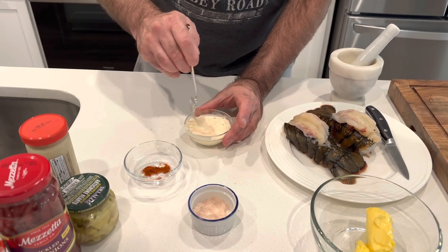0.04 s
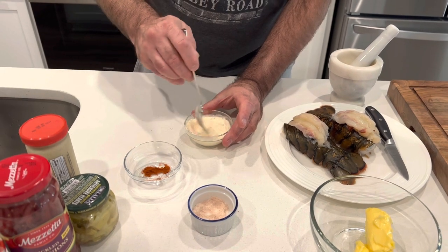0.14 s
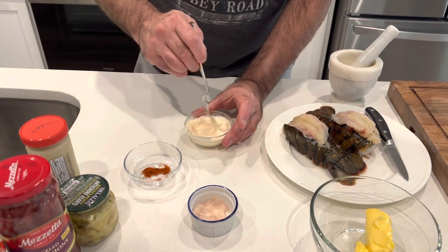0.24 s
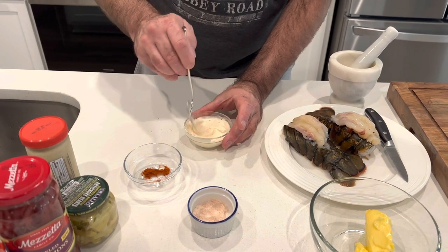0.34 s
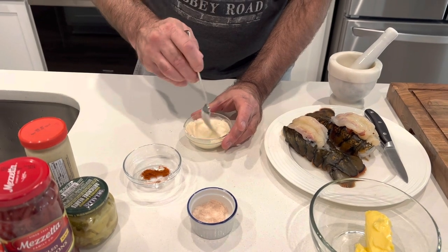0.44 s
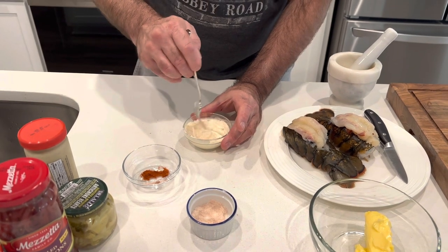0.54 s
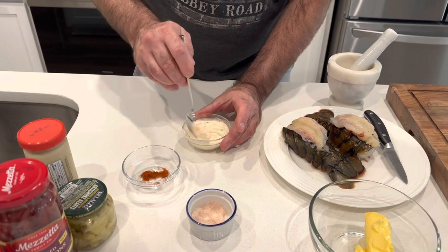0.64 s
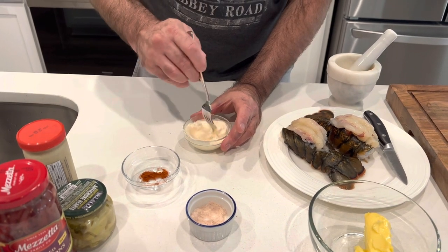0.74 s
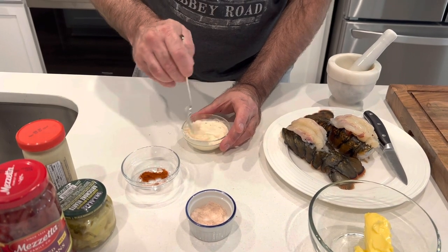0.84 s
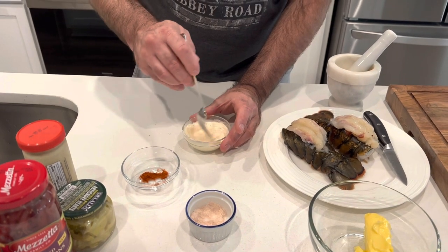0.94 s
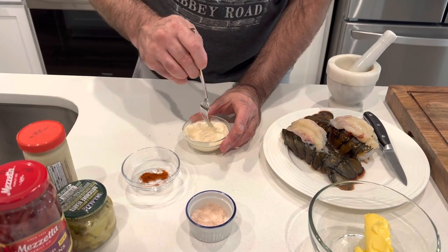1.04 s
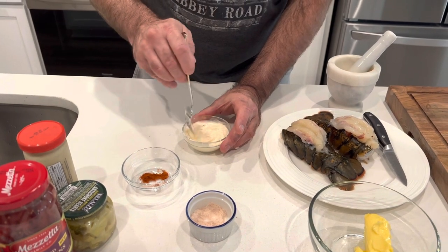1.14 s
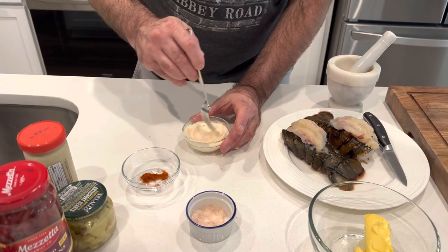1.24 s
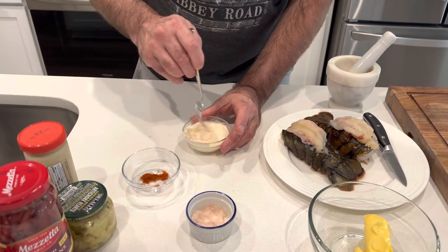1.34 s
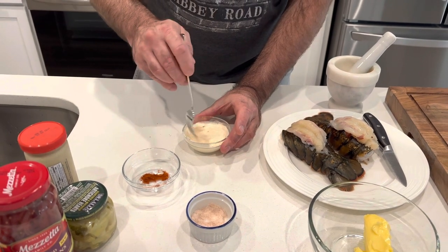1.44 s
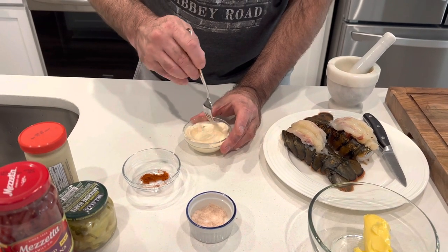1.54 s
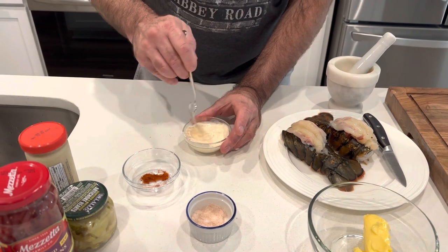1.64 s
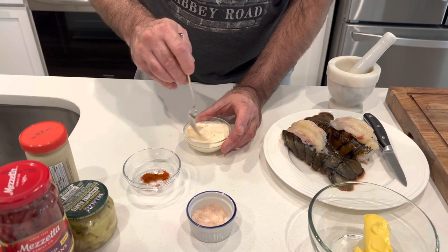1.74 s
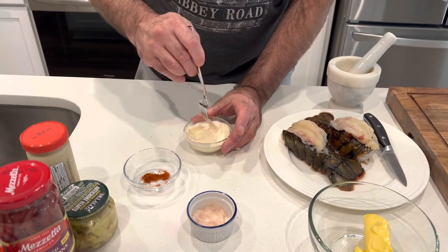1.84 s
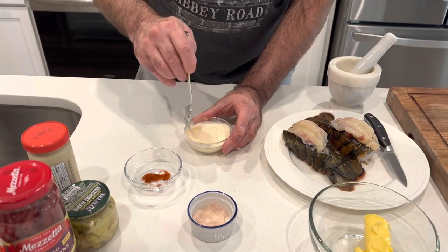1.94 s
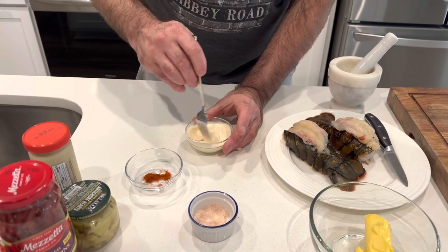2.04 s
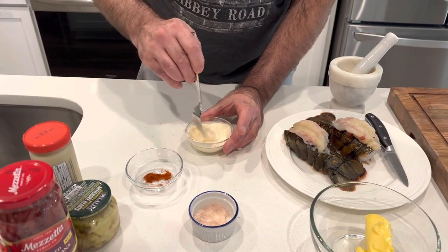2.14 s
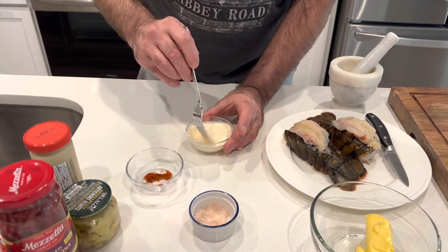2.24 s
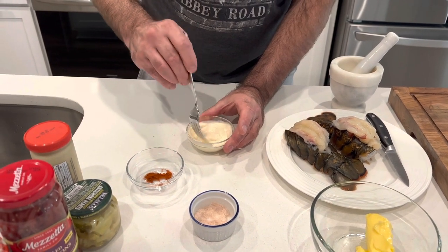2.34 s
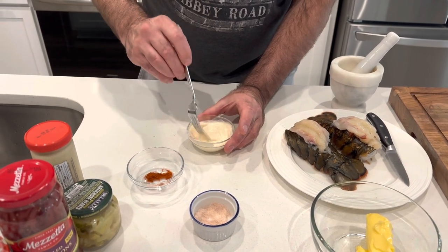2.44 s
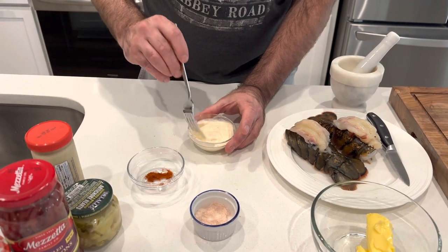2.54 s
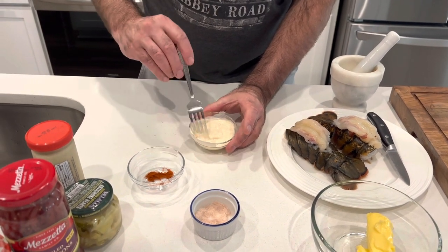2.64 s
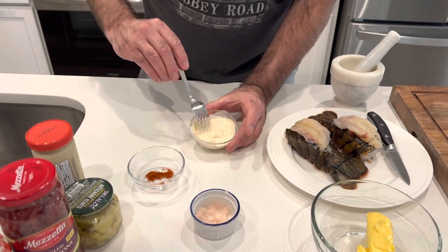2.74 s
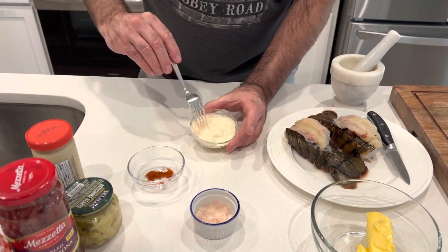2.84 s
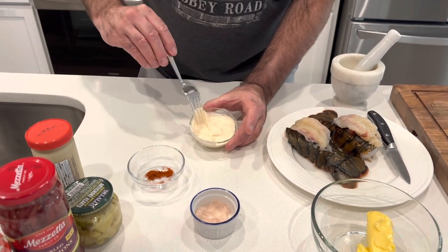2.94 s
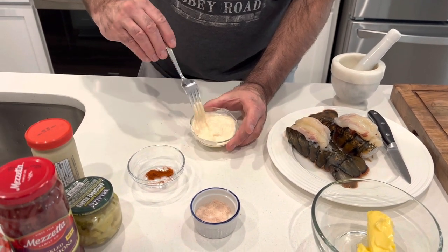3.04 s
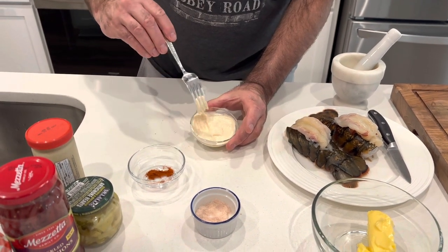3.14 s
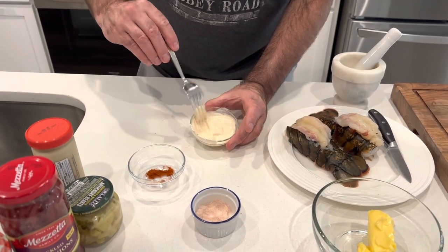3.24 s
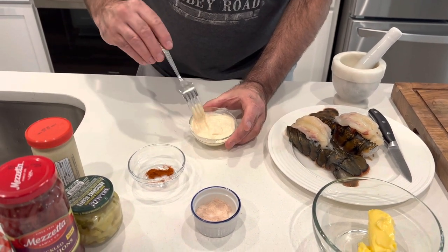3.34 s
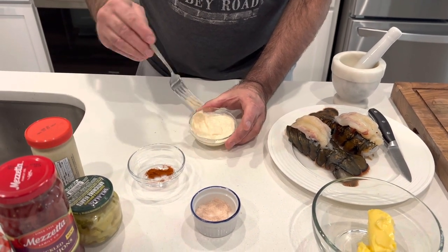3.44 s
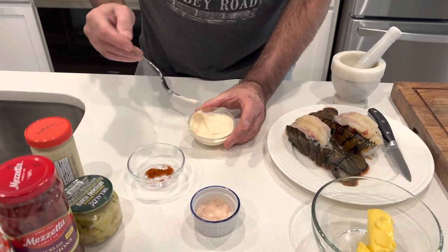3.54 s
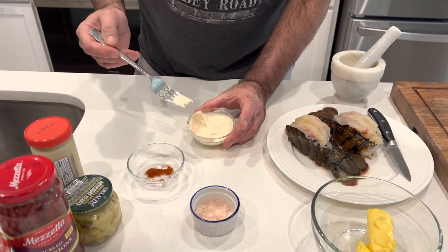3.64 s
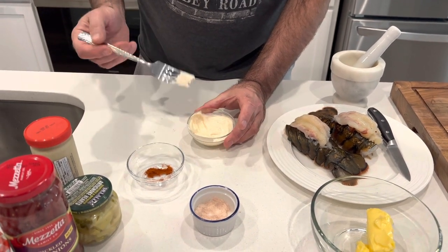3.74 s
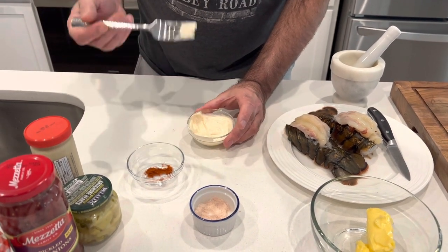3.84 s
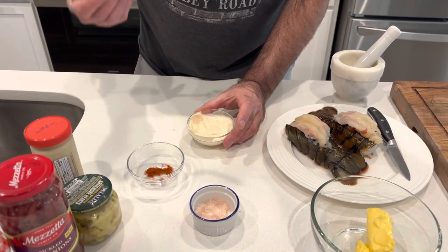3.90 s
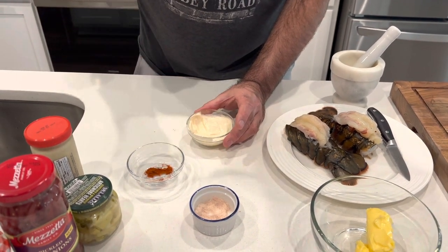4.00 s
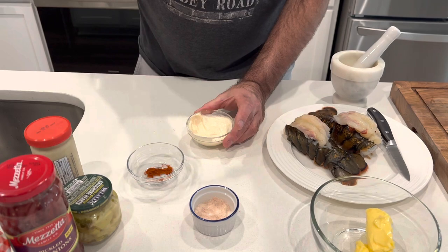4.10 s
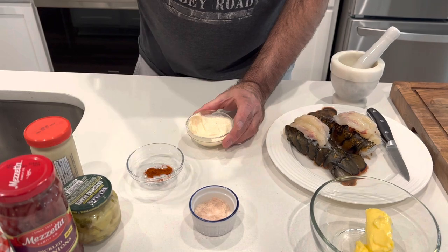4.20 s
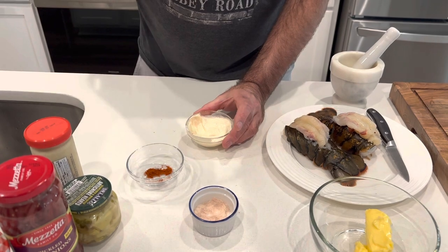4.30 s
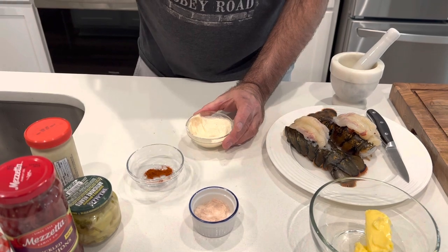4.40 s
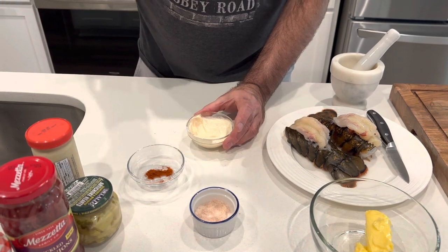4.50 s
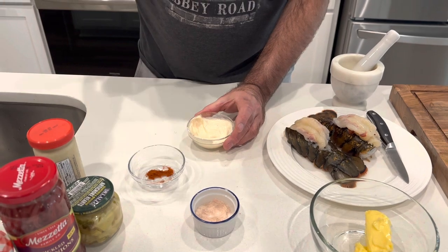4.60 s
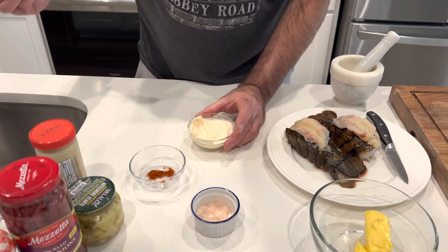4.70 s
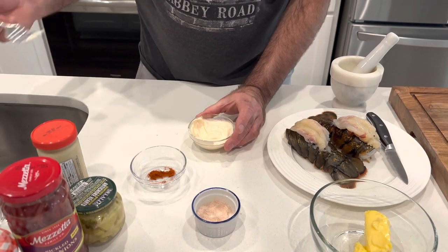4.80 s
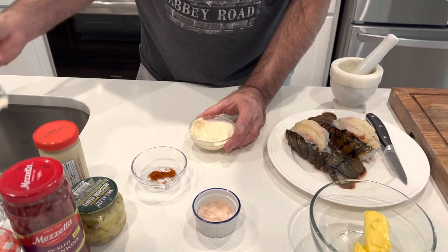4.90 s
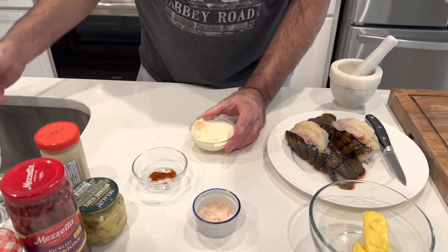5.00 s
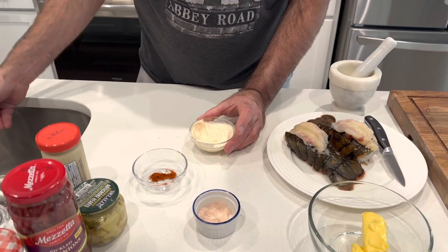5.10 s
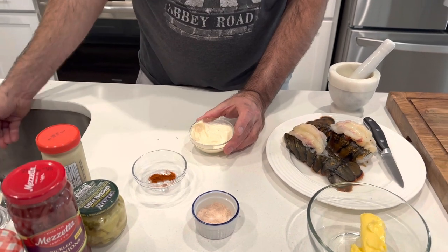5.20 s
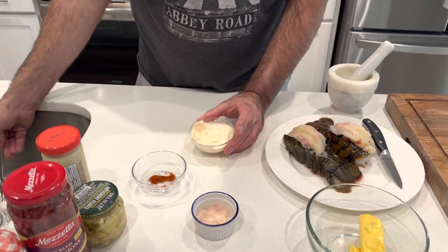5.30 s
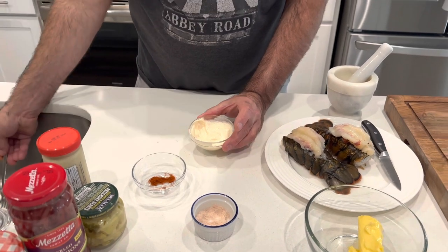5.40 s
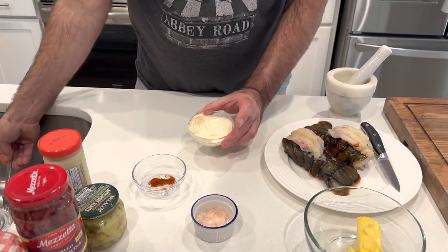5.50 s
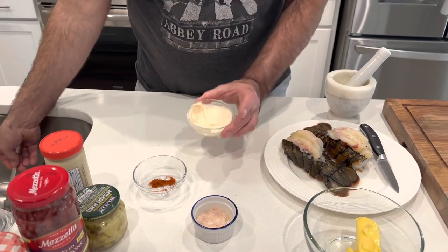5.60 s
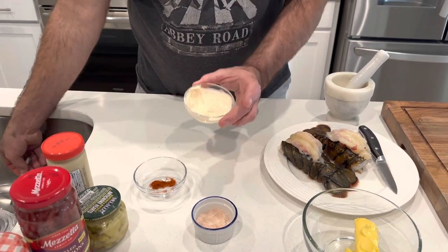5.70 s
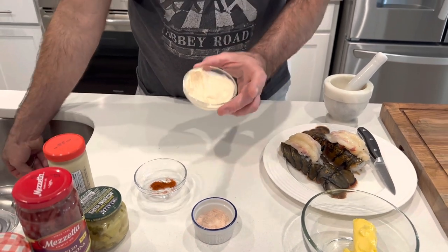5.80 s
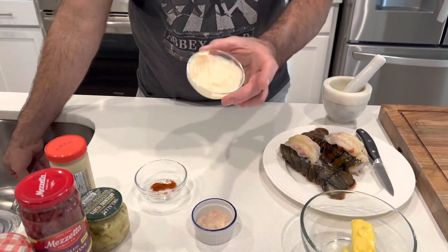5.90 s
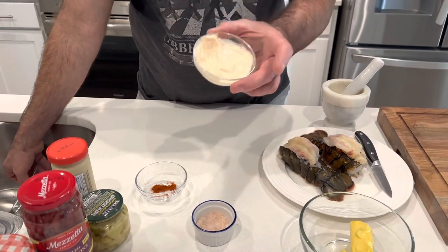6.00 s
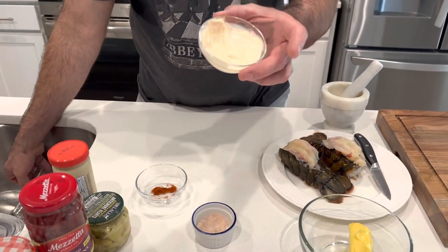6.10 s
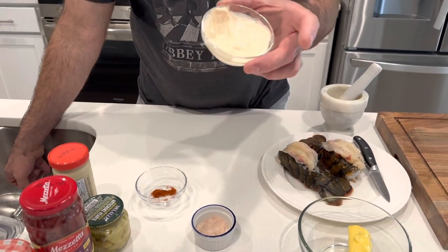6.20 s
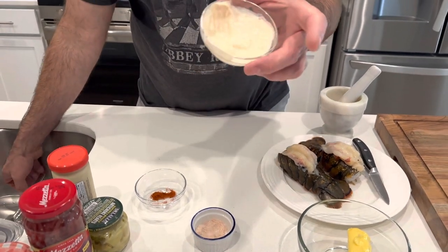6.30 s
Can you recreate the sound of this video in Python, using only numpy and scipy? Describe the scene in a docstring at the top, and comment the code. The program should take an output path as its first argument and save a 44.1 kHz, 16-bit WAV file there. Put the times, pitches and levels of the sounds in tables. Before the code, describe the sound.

A fork stirs thick sauce in a small glass bowl, ticking about four times a second while the bowl knocks on a stone counter. The strokes soften into small squelches, and one sharp tap hits the rim. Faint lip smacks follow in a lull. Then the fork scrapes and drops with a clatter into a steel sink on the left. Appliances hum low in the lively kitchen, heard from nearby in stereo.

```python
"""A fork stirs thick sauce in a small glass bowl on a stone kitchen counter.
Each turn the tines tick on the glass; a few ms later the pushed bowl knocks and rocks on the stone.
The sauce squelches, a sharp tap on the rim sheds it, and lips smack faintly, tasting.
The fork is lowered into a steel sink on the left, slides and drops with a clatter.
Appliances drone low in the live room."""
import sys
import numpy as np
from scipy import signal
from scipy.fft import rfft, irfft, next_fast_len
from scipy.io import wavfile

SR = 44100
rng = np.random.default_rng(int(sys.argv[2]) if len(sys.argv) > 2 else 0)


def generate_wav(signal):
    """Clip the signal to [-1, 1] and save it as 16-bit WAV at the path in sys.argv[1]."""
    frames = np.transpose(np.atleast_2d(signal))
    scaled = np.clip(frames, -1, 1) * 32767
    pcm = np.round(scaled).astype(np.int16)
    wavfile.write(sys.argv[1], SR, pcm)


N = 280035
LEAD = SR // 5   # samples before t = 0
TIME = np.arange(-LEAD, N) / SR
AGE = np.arange(SR * 3 // 5) / SR   # s since a contact
KNOCK_LAG_S = .0027   # tick to bowl meeting stone

# one push per turn: t/s, tick/dB, tick treble/dB, knock/dB, knock brightness/dB,
# rock-back delay/s, rock re knock/dB, thud/dB
STROKES = [(-0.06, -18, -7, -20.5, 9.5, 0.0063, -0.5, -39.5),
           (0.2173, -22.5, -6, -16.5, 8, 0.0065, -24, -44),
           (0.4834, -21, -13, -15.5, 4, .0065, -4.5, -37.5),
           (0.7466, -24, -11.5, -20, 4, 0.0065, -2, -44.5),
           (1.002, -19.5, -13.5, -15.5, 3, 0.0088, -10.5, -44),
           (1.2784, -18, -0.5, -16.5, 5, 0.0061, -2, -45.5), (1.5443, -16.5, -5, -18, 4.5, 0.011, 0.5, -46),
           (1.8254, -20.5, -7, -14, 3, 0.0091, -2, -40.5),
           (2.3103, -26.5, 3.5, -34.5, 5.5, 0.013, -6.5, -38.5),
           (2.4888, -24.5, 6.5, -33.5, 0, 0.014, 5.5, -42)]
# light touches between pushes: t/s, tick/dB, tick treble/dB, knock/dB
GRAZES = [(0.203, -30, -9, -29), (0.3997, -29, 0, -35.5), (0.6525, -30.5, -3, -43), (0.9275, -33, -3, -41),
          (1.999, -30.5, 1, -33), (2.098, -40.5, -14, -42.5), (2.664, -34.5, -10, -42)]
# two wipes on the rim, one sharp tap: t/s, level/dB
RIM_TAPS = [(2.871, -38), (2.904, -47), (3.2675, -17)]


def from_db(db):
    return 10 ** (np.asarray(db) / 20)


def rms_one(x):
    return x / np.sqrt(np.mean(x ** 2) + 1e-20)


def at_hz(points, hz):
    """Interpolate over log frequency."""
    f, value = np.transpose(points)
    return np.interp(np.log(np.maximum(hz, 1)), np.log(f), value)


def envelope(moves, attack_db_per_s, release_db_per_s):
    """Gain of rubbing moves: swell, hold, fade."""
    return sum(from_db(db - attack_db_per_s * np.maximum(s - TIME, 0)
                       - release_db_per_s * np.maximum(TIME - s - hold_s, 0))
               for s, hold_s, db in moves)


def decay(t60_s):
    return np.exp(-np.log(1000) * AGE / t60_s)


def coloured(x, spectrum):
    """Filter by (f/Hz, level/dB) points; rms 1."""
    size = next_fast_len(x.shape[-1])
    gain = from_db(at_hz(spectrum, np.fft.rfftfreq(size, 1 / SR)))
    return rms_one(irfft(rfft(x, size) * gain, size)[..., :x.shape[-1]])


def crack(spectrum, t60_s):
    """Dense, fast-dying noise of a contact."""
    burst = coloured(rng.standard_normal(len(AGE)), spectrum) * decay(t60_s)
    return rms_one(burst) * np.sqrt(np.mean(decay(t60_s) ** 2))


def ring(modes, spread_db, detune, tilt_db_per_oct=0):
    """Damped modes; strike point and grip vary their levels and pitches per blow."""
    hz, db, t60_s = np.transpose(modes)
    shift, share = rng.uniform(-1, 1, (2, len(hz)))
    hz = hz * (1 + detune * shift)
    gain = from_db(db + tilt_db_per_oct * np.log2(hz) + spread_db * share)
    gain = gain / np.linalg.norm(gain) * np.sign(rng.standard_normal(len(hz)))
    return sum(g * np.sin(2 * np.pi * f * AGE) * decay(d) for g, f, d in zip(gain, hz, t60_s))


def grains(per_s, spread_db, spectrum):
    """Random tiny slips of uneven size; rms 1."""
    sizes = from_db(spread_db * np.minimum(rng.exponential(1, len(TIME)), 4))
    slips = sizes * rng.standard_normal(len(TIME))
    return coloured(slips * (rng.random(len(TIME)) < per_s / SR), spectrum)


def add(track, s, sound, rise_s):
    """Mix in a contact at time s; its force builds over rise_s."""
    start = LEAD + round(s * SR)
    part = (sound * (1 - np.exp(-AGE / rise_s)))[:max(len(TIME) - start, 0)]
    track[start:start + len(part)] += part


def tines():
    """Steel on hand-damped glass: bright ticks, stopped at once by the sauce."""
    resonances = [(4500, -13.5), (6600, 2), (7850, -4), (9000, 6.5), (13420, -6)]   # tine modes: f/Hz, level/dB
    spectrum = [(300, -23), (900, -3.5), (2200, 16.5), (3300, -7), (4600, 15), (6500, -3.5), (8500, 4.5),
                (11200, 2.5), (12700, -10), (15500, -9)]   # contact noise: f/Hz, level/dB
    modes = [(hz, db, .012) for hz, db in resonances]
    ticks = [(s, db, treble_db) for s, db, treble_db, _ in GRAZES]
    for s, db, treble_db, _, _, rock_s, _, _ in STROKES:
        ticks.append((s, db, treble_db))
        ticks.append((s + KNOCK_LAG_S + rock_s, db - 17.5, treble_db))   # glass rocks back into tines
    out = np.zeros(len(TIME))
    for s, db, treble_db in ticks:
        tilt_db_per_oct = .66 * (treble_db + 10.5)
        colour = [(hz, d + tilt_db_per_oct * np.log2(max(hz, 5000))) for hz, d in spectrum]
        click = from_db(3) * crack(colour, t60_s=.011)
        tone = from_db(-1.5) * ring(modes, spread_db=2, detune=.04, tilt_db_per_oct=tilt_db_per_oct)
        add(out, s, from_db(db) * (click + tone), rise_s=.0011)
    return out


def bowl():
    """Glass foot clacks on stone. A push knocks and rocks back once; grazes and rim taps only nudge."""
    modes = [(778, -7.5, 0.073), (871, -1, 0.034), (1077, -3, 0.012), (1126, -0.5, 0.045),
             (1285, -2, 0.055), (1443, -1, 0.047), (1720, -2, 0.049), (1905, -1, 0.053), (2083, 3, .015)]   # glass modes: f/Hz, level/dB, t60/s
    spectrum = [(100, -30), (250, -30.5), (660, -12), (870, -0.5), (1250, -5), (2200, 0.5), (3200, -9.5),
                (4500, -20), (7000, -48.5)]   # contact noise: f/Hz, level/dB
    knocks = [(s, db, 5.5) for s, _, _, db in GRAZES]   # t/s, level/dB, brightness/dB
    knocks += [(s, db - 11, -.5) for s, db in RIM_TAPS]
    for s, _, _, db, bright_db, rock_s, rock_db, _ in STROKES:
        knocks += [(s, db, bright_db), (s + rock_s, db + rock_db, bright_db)]
    out = np.zeros(len(TIME))
    for s, db, bright_db in knocks:
        tilt_db_per_oct = bright_db - 3.5
        colour = [(hz, d + tilt_db_per_oct * np.log2(np.clip(hz, 700, 2200))) for hz, d in spectrum]
        clack = from_db(-4.5) * crack(colour, t60_s=.034)
        tone = from_db(-1.5) * ring(modes, spread_db=1.8, detune=.022, tilt_db_per_oct=tilt_db_per_oct)
        add(out, s + KNOCK_LAG_S, from_db(db) * (clack + tone), rise_s=.0006)
    return out


def counter():
    """The counter gives under each push and graze: a slightly late, low thud."""
    modes = [(107.6, -10.5, 0.15), (186, -1, 0.065), (228, 0, 0.1), (390, -2.5, 0.082)]   # slab modes: f/Hz, level/dB, t60/s
    lag_s = .005
    thuds = [(s, db) for s, *_, db in STROKES] + [(s, db - 18) for s, db, *_ in GRAZES]
    out = np.zeros(len(TIME))
    for s, db in thuds:
        add(out, s + lag_s, from_db(db + 2.5) * ring(modes, spread_db=2.6, detune=.12), rise_s=.003)
    return out


def stirring():
    """Sauce slips round the fork in tiny grains."""
    moves = [(0, 1.9, -62), (2.92, 0.11, -59)]   # stir, then scoop: t/s, hold/s, level/dB
    spectrum = [(300, -23), (900, -8), (2000, -2.5), (3200, -6), (8500, -12.5), (11000, -35.5)]   # wet slips: f/Hz, level/dB
    gain = from_db(-6.5) * envelope(moves, attack_db_per_s=390.5, release_db_per_s=244.5)
    return gain * grains(per_s=1200, spread_db=1.3, spectrum=spectrum)


def appliances():
    """Low drone, alike on both sides, under a thin diffuse hiss."""
    spectrum = [(15, -39), (50, -10), (112, 2), (150, -8.5), (400, -23), (750, -35), (1400, -40),
                (3000, -49.5), (9000, -55), (12000, -63)]   # steady room noise: f/Hz, level/dB
    mid, side = coloured(rng.standard_normal((2, N)), spectrum)
    highpass = signal.butter(2, 350, "high", fs=SR, output="sos")
    side = .24 * side + .63 * signal.sosfilt(highpass, side)
    return from_db(-57) * (mid + side * [[1], [-1]])


def taps_and_lips():
    """Soft taps in the bowl, then faint wet lip smacks of tasting; one broad resonance each."""
    contacts = [(2.245, -35, 940), (2.904, -30.5, 1490), (2.92, -39, 1510), (3.92, -41, 1393),
                (3.972, -44, 1456), (4.312, -53.5, 1403), (4.931, -44, 5560)]   # soft contacts: t/s, level/dB, f/Hz
    out = np.zeros(len(TIME))
    for s, db, hz in contacts:
        colour = [(hz / 3, -22), (hz * .8, 0), (hz * 1.4, -2), (hz * 2.5, -16), (hz * 8, -32)]
        add(out, s, from_db(db - 5.5) * crack(colour, t60_s=.01), rise_s=.0005)
    return out


def squelches():
    """Dragged tines open a wet hollow; slips of sauce sound through its narrow resonance."""
    drags = [(2.312, -31.5), (2.505, -35)]   # drags through the sauce: t/s, level/dB
    hollow_hz = 1840
    colour = [(hollow_hz * 2 ** octaves, db) for octaves, db in [(-.5, -30), (0, 0), (.5, -30)]]
    out = np.zeros(len(TIME))
    for s, db in drags:
        add(out, s, from_db(db) * crack(colour, t60_s=.088), rise_s=.002)
    return out


def rim():
    """Fork on the bare rim: bright crack, light ring, one bounce."""
    modes = [(769, 4.5, 0.11), (1142, 1, .2), (2464, -6, 0.19), (4100, -1.5, .2)]   # rim modes: f/Hz, level/dB, t60/s
    spectrum = [(450, -31), (850, -4.5), (4000, 1.5), (6500, 2), (8000, 3.5), (10500, -8), (16000, -8.5)]   # contact noise: f/Hz, level/dB
    bounce_s, bounce_db = .012, -11.5
    out = np.zeros(len(TIME))
    for tap_s, tap_db in RIM_TAPS:
        for s, db in [(tap_s, tap_db), (tap_s + bounce_s, tap_db + bounce_db)]:
            click = from_db(4.5) * crack(spectrum, t60_s=.01)
            tone = from_db(-22.5) * ring(modes, spread_db=.91, detune=0)
            add(out, s, from_db(db) * (click + tone), rise_s=.001)
    return out


def sink():
    """The fork chatters on steel, dull until let go; the thin basin booms under it."""
    landings = [(5.4374, -32.5, 3), (5.485, -33, -0.5), (5.521, -41, 4.5), (5.7272, -37, 12.5),
                (5.8067, -43, -2.5), (5.9606, -44, -3), (5.9835, -40.5, -3.5), (6.12, -23, 0),
                (6.1304, -20, 3), (6.1547, -23.5, 2), (6.2212, -31.5, 5), (6.268, -46, 3)]   # fork on sink: t/s, level/dB, tilt/(dB/oct)
    fork_modes = [(1147, -8, 0.24), (1958, 2.5, 0.082), (2490, 1.5, 0.092), (2560, 7, 0.097),
                  (2586, 2.5, 0.088), (4345, -1, 0.11), (4635, 1, 0.062), (6340, 1.5, 0.13),
                  (8836, -7, 0.16), (14500, -13.5, 0.14)]   # free fork: f/Hz, level/dB, t60/s
    basin_modes = [(114, -5, 0.23), (185.4, 11, 0.25), (251.7, -2, 0.28)]   # sheet steel: f/Hz, level/dB, t60/s
    spectrum = [(150, -18), (700, 0), (1500, -1), (2400, 8), (3300, -5), (4700, 5), (5700, 0.5),
                (7900, -12.5), (9700, -3), (11300, -13), (14700, -13), (16000, -29)]   # contact noise: f/Hz, level/dB
    let_go_s, bounce_s, loss_db, contacts = 6.1, .0068, 3.5, 4
    jitters = rng.uniform(-.25, .25, (len(landings), contacts))
    jitters[:, 0] = 0
    out = np.zeros(len(TIME))
    for (s, db, tilt_db_per_oct), jitter in zip(landings, jitters):
        colour = [(hz, d + tilt_db_per_oct * np.log2(max(hz, 2000))) for hz, d in spectrum]
        for k in range(contacts):
            free = s > let_go_s and k == 0   # else choked by fingers or the next bounce
            t60_share, detune = (1, .002) if free else (.25, .025)
            modes = [(hz, d, t60_s * t60_share) for hz, d, t60_s in fork_modes]
            click = from_db(-5) * crack(colour, t60_s=.015)
            tone = from_db(-7) * ring(modes, spread_db=3, detune=detune, tilt_db_per_oct=tilt_db_per_oct)
            clang = from_db(db - loss_db * k) * (click + tone)
            add(out, s + bounce_s * (k + jitter[k]), clang, rise_s=.0008)
    for s, db, _ in landings:
        boom = ring(basin_modes, spread_db=1.7, detune=.014)
        add(out, s, from_db(-34.5 + .59 * db) * boom, rise_s=.004)
    return out


def scrape():
    """The tip sticks and slips on steel: grains, wavering resonances, one rising squeak."""
    slides = [(5.47, 0.034, -63), (5.678, 0.059, -54), (5.94, 0.037, -67.5)]   # slides on the sink: t/s, hold/s, level/dB
    spectrum = [(1000, 3), (3400, 0), (5000, 16), (8000, 5), (10000, 13.5), (12000, -8), (14000, 0),
                (16000, -10)]   # friction noise: f/Hz, level/dB
    tip_modes = [(1950, 0), (4480, 3), (5330, 3.5), (6140, 2), (7500, -22), (8960, -6)]   # tip resonances: f/Hz, level/dB
    glide = [(5.67, 4557), (5.76, 5660)]   # squeak pitch: t/s, f/Hz

    def squeal(hz):
        flutter, waver = coloured(rng.standard_normal((2, len(TIME))), [(50, 0), (400, -50)])
        return flutter * np.sin(2 * np.pi * np.cumsum(hz * (1 + .008 * waver)) / SR)

    resonances = rms_one(sum(from_db(db) * squeal(hz) for hz, db in tip_modes))
    squeak = squeal(np.interp(TIME, *np.transpose(glide)))
    grit = grains(per_s=900, spread_db=2.5, spectrum=spectrum)
    rub = from_db(-3) * grit + from_db(-5) * resonances + from_db(-8) * squeak
    return envelope(slides, attack_db_per_s=460, release_db_per_s=350) * rub


def kitchen(build_s):
    """Diffuse stereo tail, dying band by band; the sides are alike only in the bass."""
    spectrum = [(200, 15.5), (380, 11.5), (900, 0.5), (4000, 2), (8500, 2), (11000, 1)]   # tail colour: f/Hz, level/dB
    decay_times = [(150, 0.14), (600, 0.67), (2000, 0.62), (4500, 0.46), (9000, 0.43), (13000, 0.069)]   # room decay: f/Hz, t60/s
    edges_hz = np.geomspace(60, 18000, 13)
    tail = 0
    for low, high in zip(edges_hz, edges_hz[1:]):
        hz = np.sqrt(low * high)
        bandpass = signal.butter(2, [low, high], "band", fs=SR, output="sos")
        mid, side = signal.sosfilt(bandpass, rng.standard_normal((2, len(AGE))))
        coherence = 1 / (1 + (hz / 650) ** 2)
        pair = np.sqrt(1 + coherence) * mid + np.sqrt(1 - coherence) * side * [[1], [-1]]
        tail = tail + pair * from_db(at_hz(spectrum, hz)) * decay(at_hz(decay_times, hz))
    return rms_one(tail * (1 - np.exp(-AGE / build_s)) ** 2) / np.sqrt(len(AGE))


def placed(x, room, lag_ms, left_db, echo_db, room_db):
    """Direct sound, left first; echoes from alternate sides; room tail."""
    echoes = [(.0031, -6), (.0074, -13.5), (.0118, -15.5), (.021, -16.5)]   # off counter, body and cupboards: t/s, level/dB
    size = next_fast_len(len(TIME) + len(AGE))
    phase_per_s = -2j * np.pi * np.fft.rfftfreq(size, 1 / SR)
    sides = np.array([[-.5], [.5]])
    path = from_db(-sides * left_db) * np.exp(phase_per_s * sides * lag_ms / 1000)
    for k, (s, db) in enumerate(echoes):
        delay_s = s + sides * .00026 * (-1) ** k
        path += from_db(db + echo_db) * np.exp(phase_per_s * delay_s)
    path += from_db(room_db) * rfft(room, size)
    return irfft(rfft(x, size) * path, size)[:, LEAD:LEAD + N]


def scene():
    room = kitchen(build_s=.0012)
    sauce = stirring()
    mix = placed(tines(), room, lag_ms=.14, left_db=-.5, echo_db=2, room_db=-6)
    mix += placed(rim(), room, lag_ms=.13, left_db=5, echo_db=-4, room_db=-1.5)
    mix += placed(bowl() + counter(), room, lag_ms=.1, left_db=2, echo_db=-11, room_db=-7)
    soft = sauce + taps_and_lips() + squelches()
    mix += placed(soft, room, lag_ms=.13, left_db=3, echo_db=-8, room_db=-6.5)
    mix += placed(scrape() + sink(), room, lag_ms=.17, left_db=17, echo_db=5.5, room_db=3)
    return mix + appliances()


def record(dry):
    """Microphone pair: high up, right becomes a lagging copy of left; the top is cut steeply."""
    lag_cycles = [(9800, 0.74), (11200, .5), (12400, 0.22), (13300, 0.28), (14500, 0.071)]   # right behind left: f/Hz, lag/cycles
    join_hz, fade_hz, cutoff_hz = 9000, 1400, 16100
    size = next_fast_len(N + LEAD)
    hz = np.fft.rfftfreq(size, 1 / SR)
    left, right = rfft(dry, size)
    blend_rad = np.clip((hz - join_hz) / fade_hz, 0, 1) * np.pi / 2
    late_left = left * np.exp(-2j * np.pi * at_hz(lag_cycles, hz))
    right = np.cos(blend_rad) * right + np.sin(blend_rad) * late_left
    pair = irfft(np.array([left, right]), size)[:, :N]
    return signal.sosfilt(signal.ellip(10, .1, 80, cutoff_hz, fs=SR, output="sos"), pair)


dry = scene()
out = record(dry)
generate_wav(out)
```